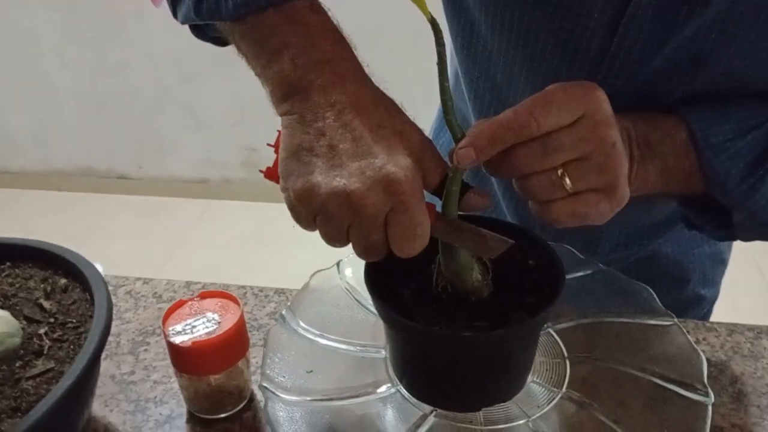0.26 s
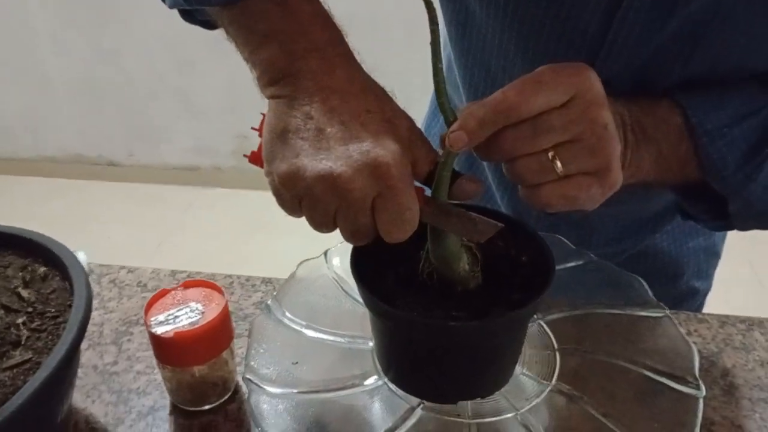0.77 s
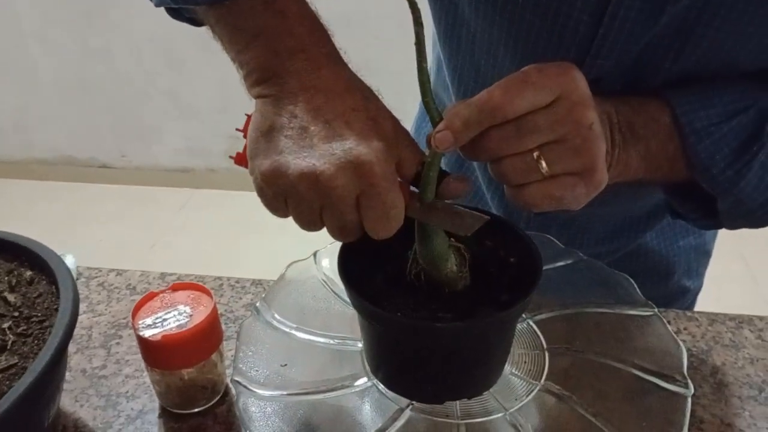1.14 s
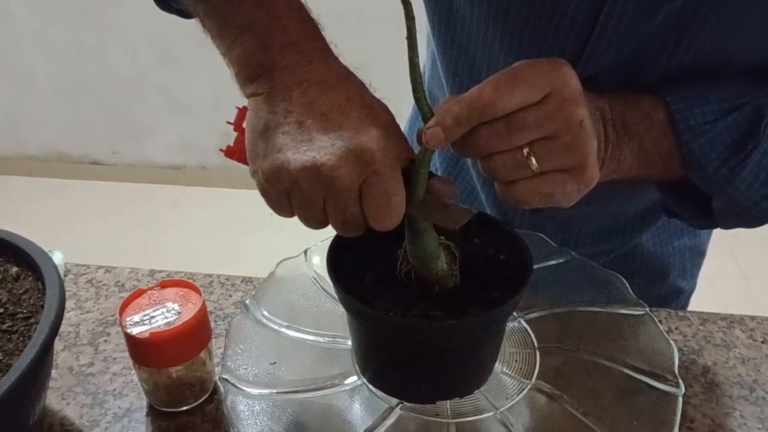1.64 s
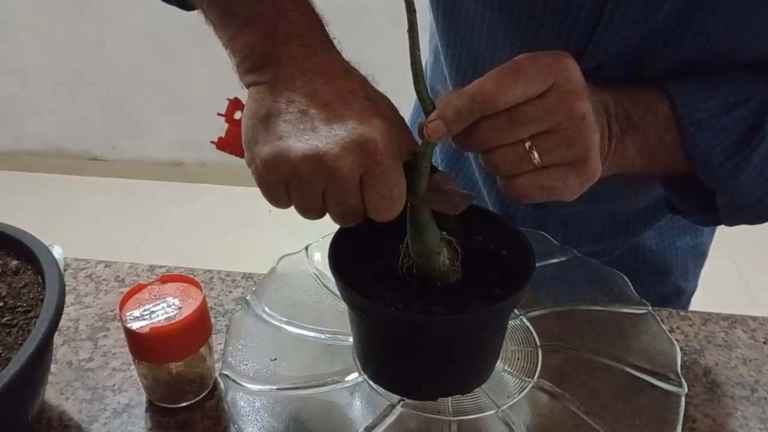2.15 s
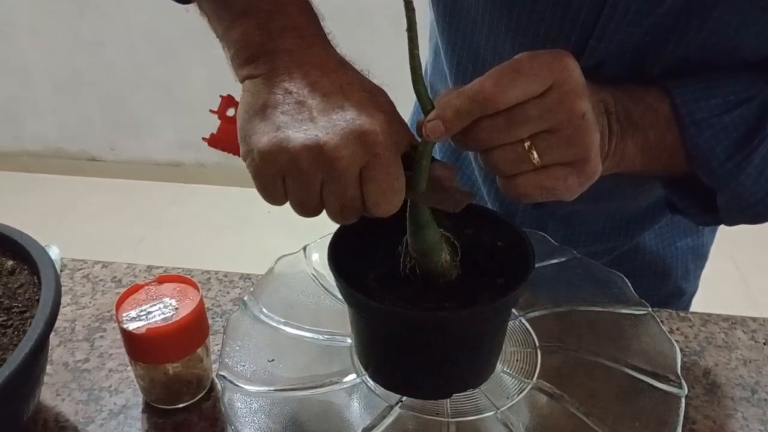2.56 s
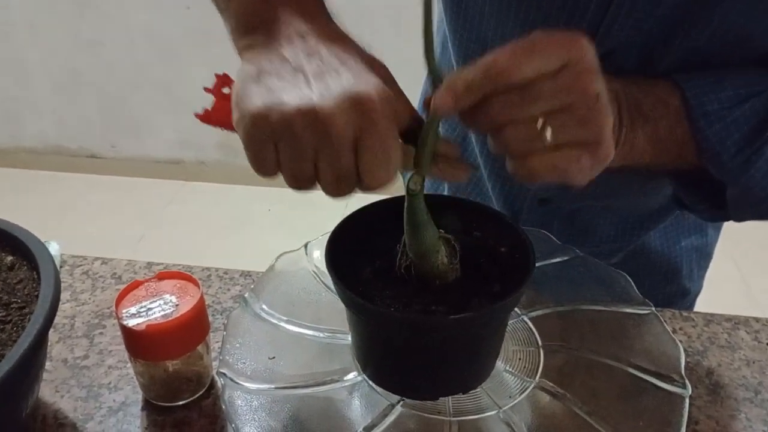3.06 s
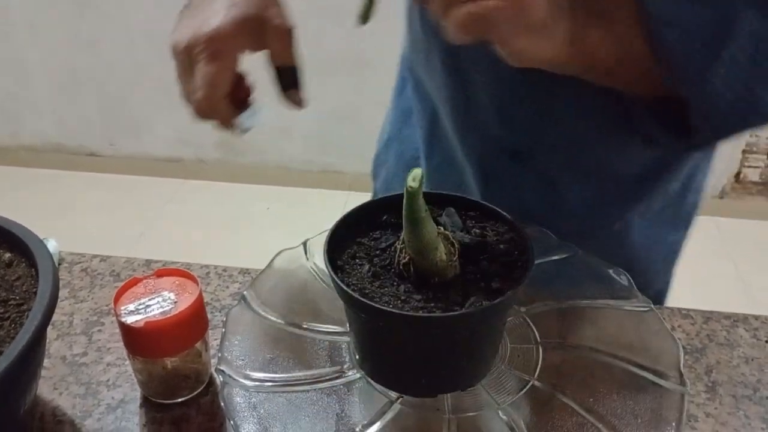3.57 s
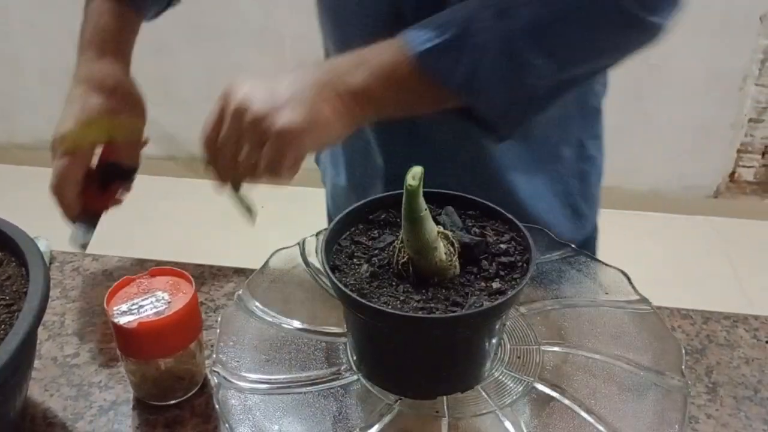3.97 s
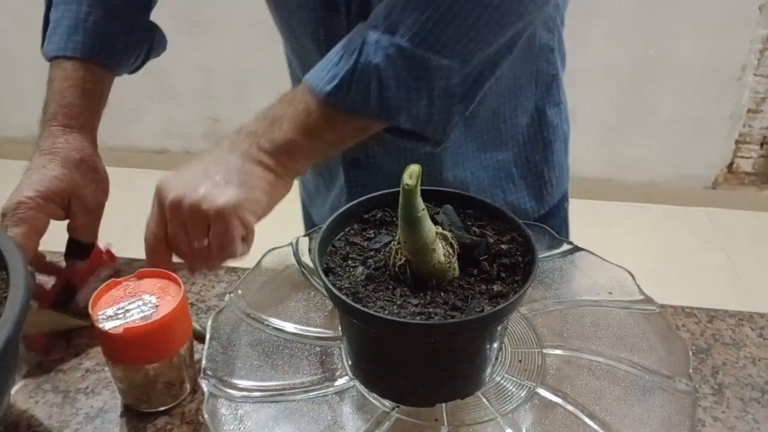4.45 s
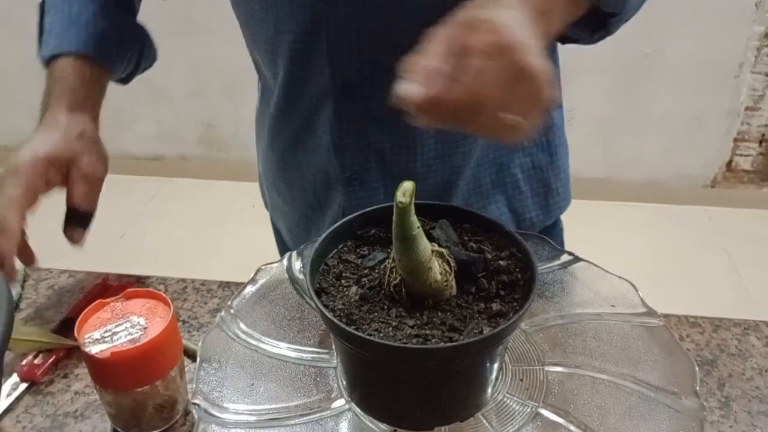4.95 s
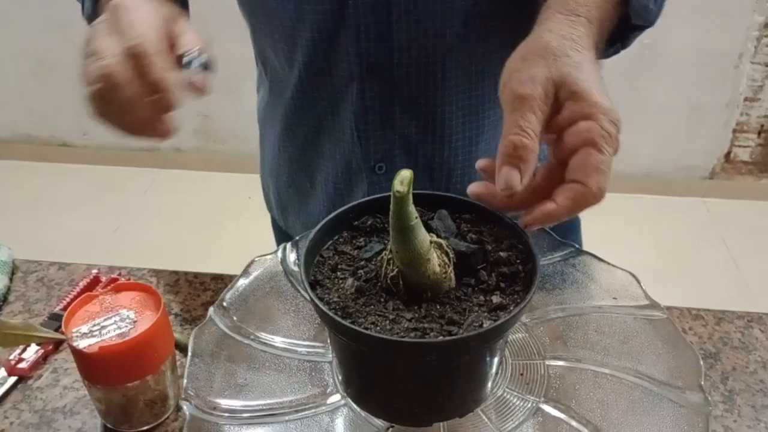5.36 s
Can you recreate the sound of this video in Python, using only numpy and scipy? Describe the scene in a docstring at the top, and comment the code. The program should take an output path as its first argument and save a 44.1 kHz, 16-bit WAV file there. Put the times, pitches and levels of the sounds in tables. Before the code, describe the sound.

Faint snaps of a stem being cut, then a dropped knife rattles loudly on stone in a bare, humming room.

```python
"""Cutting a stem, dropping the knife

A snap-off knife works through a fleshy plant stem in a pot on a glass plate: fibres snap in faint
clicks, rubbing squeaks, and the plate rings as the stem gives. Sleeves rustle, then the knife is
let go and clatters on a stone counter, its steel channel rattling and its loose blade ringing.
The bare, hard room answers, over a low hum."""
import sys
import numpy as np
from scipy import signal
from scipy.fft import rfft, irfft, next_fast_len
from scipy.io import wavfile

SR = 44100
rng = np.random.default_rng(int(sys.argv[2]) if len(sys.argv) > 2 else 0)


def log_audio(samples):
    """Write samples as a 16-bit WAV file to the path given in sys.argv[1]."""
    # one column per channel
    frames = np.atleast_2d(samples).T
    # limit to full scale, then quantise
    limited = np.clip(frames, -1, 1)
    pcm = np.round(limited * 32767).astype(np.int16)
    wavfile.write(sys.argv[1], SR, pcm)


N = 247576


def amp(db):
    """Decibels to gain."""
    return 10 ** (np.asarray(db) / 20)


def unit_rms(x):
    """Scale to rms 1."""
    return x / np.sqrt(np.mean(x ** 2) + 1e-20)


def curve_at(points, hz):
    """Interpolate (Hz, value) points on a log frequency axis."""
    freqs, values = np.transpose(points)
    return np.interp(np.log(hz + 1), np.log(freqs + 1), values)


def wobble(rate_hz, size=N):
    """Straight lines between Gaussian knots, rate_hz knots a second."""
    place = np.arange(size) * rate_hz / SR
    knots = rng.standard_normal(size // 16)
    return np.interp(place, np.arange(len(knots)), knots)


def noise(gain, size):
    """Noise of rms 1 with spectrum gain(Hz)."""
    m = next_fast_len(size)
    spectrum = rfft(rng.standard_normal(m)) * gain(np.fft.rfftfreq(m, 1 / SR))
    return unit_rms(irfft(spectrum, m)[:size])


def hiss(spectrum, size=N):
    """Noise of rms 1 coloured by (Hz, dB) points."""
    return noise(lambda hz: amp(curve_at(spectrum, hz)), size)


def resonance(hz, centre_hz, width_hz):
    """Power response of one resonance."""
    return 1 / (1 + (2 * (hz - centre_hz) / width_hz) ** 2)


def strike(t, rise_s, t60_s):
    """Envelope: linear rise, exponential decay."""
    return np.minimum(t / rise_s, 1) * amp(-60 * np.maximum(t - rise_s, 0) / t60_s)


def swells(rows):
    """Envelope: Gaussian bumps (middle s, length s, dB), summed in power."""
    t = np.arange(N) / SR
    bumps = (amp(db) * np.exp(-(2 * (t - middle_s) / length_s) ** 2) for middle_s, length_s, db in rows)
    return np.sqrt(sum(bump ** 2 for bump in bumps))


def add(track, start_s, sound):
    """Mix a sound in at start_s."""
    part = track[round(start_s * SR):][:len(sound)]
    part += sound[:len(part)]


# Hum tones. Each row: frequency in Hz, level in dB.
HUM_TONES = [(61, -75.5), (118.4, -70), (2256, -85.5)]
# Drone swells. Each row: middle in seconds, length in seconds, level in dB.
DRONE_RISES = [(2.75, 0.86, -62), (4.08, 0.54, -62.5)]
# Rumble and hiss. Each row: frequency in Hz, relative level in dB.
AIR_SPECTRUM = [(25, -42), (45, -29), (62, -12), (100, -2.5), (135, -2.5), (180, -3.5), (260, -8.5),
                (400, -15), (550, -14.5), (1000, -21), (1400, -24), (2300, -24.5), (3300, -32), (6000, -32),
                (15800, -34)]

def background(waver_db=2.5, drift_rad=0.61, drone_hz=189.5, drone_rest_db=-72.5, air_db=-58.5):
    """A wavering hum, a slowly swelling drone and a steady dull rumble with thin hiss."""
    t = np.arange(N) / SR

    def tone(hz):
        waver = amp(waver_db * wobble(5.07))
        return waver * np.sqrt(2) * np.sin(2 * np.pi * hz * t + drift_rad * wobble(9))

    hum = sum(amp(db) * tone(hz) for hz, db in HUM_TONES)
    drone = np.hypot(amp(drone_rest_db), swells(DRONE_RISES)) * tone(drone_hz)
    return hum + drone + amp(air_db) * hiss(AIR_SPECTRUM)


# Fibres snapping under blade and fingers. Each row: start in seconds, relative level in dB,
# knock offset in dB, t60 in seconds, pitch in Hz.
FIBRE_SNAPS = [(0.541, -42.5, -7, 0.011, 4200), (0.6901, -30.5, -17, 0.0065, 10200),
               (0.8855, -31, -4, 0.019, 7600), (1.0283, -34.5, -9, .02, 11700),
               (1.1488, -52, -9, 0.013, 11500), (1.2366, -46, -5.5, 0.027, 8000),
               (1.3069, -50.5, -5, 0.018, 8000), (1.6102, -28.5, -22, 0.0054, 6000),
               (1.6118, -37.5, -15, 0.025, 10000), (1.657, -43, -8, 0.023, 7000),
               (1.733, -51.5, -16, 0.029, 11000), (1.841, -45.5, -10, 0.024, 11000),
               (2.0562, -46.5, -22, 0.024, 10500), (2.1876, -49, -15, 0.024, 7500),
               (2.74, -38.5, -10, .023, 5000), (2.8585, -33.5, -15, .014, 11400),
               (2.8843, -43, -4.5, 0.019, 11000), (3.104, -56, -4, .025, 7700),
               (3.492, -48, -12, 0.016, 5300), (4.1977, -50, -8, 0.021, 8000)]
# Tearing fibre. Each row: frequency in Hz, relative level in dB.
FIBRE_SPECTRUM = [(1500, -31), (2400, -25), (3100, -23.5), (4200, -2), (5100, -5.5), (6000, -6.5),
                  (7200, 1.5), (9000, 1), (11800, 2.5), (13300, -6), (15800, -3.5)]
# Knock of stem and pot. Each row: frequency in Hz, relative level in dB.
KNOCK_SPECTRUM = [(150, -27), (400, 1.5), (800, -10.5), (1350, 2), (1900, -6.5), (2450, -4), (3000, -34),
                  (6000, -63)]
# Blade pushes through wet flesh. Each row: middle in seconds, length in seconds, relative level in dB.
BLADE_PUSHES = [(0.915, .06, -74), (1.06, .06, -75), (1.275, .11, -63.5), (2.8, .05, -70),
                (2.9, 0.065, -67), (3.1, 0.044, -65.5)]

def fibres(crackle_db=-7, knock_db=-7, pitch_boost_db=6, pitch_width_hz=2500, drag_db=-1, grain_db=4):
    """Each fibre bundle tears in a pitched crackle and knocks the stem; between them the blade drags."""
    out, t = np.zeros(N), np.arange(SR // 16) / SR
    # single fibres part at random while the blade is in the stem
    strays = [(start_s, -53, -8, 0.012, 7000) for start_s in rng.uniform(0.7, 3.3, size=3)]
    for start_s, db, knock_offset_db, t60_s, pitch_hz in FIBRE_SNAPS + strays:
        boost_db = lambda hz: pitch_boost_db * resonance(hz, pitch_hz, pitch_width_hz)
        crackle = noise(lambda hz: amp(curve_at(FIBRE_SPECTRUM, hz) + boost_db(hz)), len(t))
        knock = amp(knock_db + knock_offset_db) * hiss(KNOCK_SPECTRUM, len(t))
        rise_s = 0.082 * t60_s  # a thicker bundle takes longer both to tear and to die away
        add(out, start_s, amp(db) * strike(t, rise_s, t60_s) * (amp(crackle_db) * crackle + knock))
    drag = unit_rms(hiss(FIBRE_SPECTRUM) * amp(grain_db * wobble(700)))
    return out + amp(drag_db) * swells(BLADE_PUSHES) * drag


# Slips. Each row: middle in seconds, length in seconds, pitch in Hz, width in Hz, level in dB.
SLIPS = [(1.3, 0.045, 3940, 149, -70), (1.809, 0.064, 2280, 80, -67), (3.072, 0.014, 4600, 1400, -66.5),
         (4.094, 0.0063, 4400, 400, -55.5), (5.427, 0.035, 4870, 600, -62),
         (5.428, 0.032, 6630, 1200, -66.5)]

def squeaks():
    """Brief narrow bands of noise where skin, stem and steel slip on each other."""
    out, t = np.zeros(N), np.arange(-SR // 10, SR // 10) / SR
    for middle_s, length_s, pitch_hz, width_hz, db in SLIPS:
        envelope = amp(db) * np.exp(-(2 * t / length_s) ** 2)
        band = noise(lambda hz: resonance(hz, pitch_hz, width_hz), len(t))
        add(out, middle_s + t[0], envelope * band)
    return out


# Modes of the pot on the glass plate. Each row: frequency in Hz, level in dB, t60 in seconds.
PLATE_MODES = [(105, -45.5, 0.13), (189, -47, 0.14), (1227, -65, .18), (1572, -64, 0.25)]

def plate(start_s=2.928, rise_s=0.0058):
    """The stem gives: the pot bumps softly and the glass rings."""
    out, t = np.zeros(N), np.arange(SR // 2) / SR
    for hz, db, t60_s in PLATE_MODES:
        add(out, start_s, amp(db) * strike(t, rise_s, t60_s) * np.sin(2 * np.pi * hz * t))
    return out


# Arm movements. Each row: middle in seconds, flap length in seconds, flap level in dB,
# relative swish level in dB.
ARM_MOVES = [(3.44, .12, -69, -66.5), (3.774, 0.22, -61.5, -64), (4.24, 0.32, -66, -64.5),
             (5.066, 0.22, -65, -67.5), (5.54, 0.093, -59.5, -69)]
# Flapping shirt. Each row: frequency in Hz, relative level in dB.
FLAP_SPECTRUM = [(120, -20), (200, -4.5), (550, -2), (850, -11.5), (1700, -8.5), (2600, -16), (4000, -42)]
# Sliding cloth. Each row: frequency in Hz, relative level in dB.
SWISH_SPECTRUM = [(1470, -30), (2500, -14), (3080, -6), (4420, 3.5), (5980, -1.5), (8790, 2.5), (14400, -5),
                  (15800, -17)]

def sleeves(swish_db=-4, swish_stretch=2.47, crease_db=2):
    """Moving arms flap the shirt and slide cloth over cloth."""
    flap = swells([(s, length_s, db) for s, length_s, db, _ in ARM_MOVES])
    swish = swells([(s, swish_stretch * length_s, db + swish_db) for s, length_s, _, db in ARM_MOVES])
    creases = amp(crease_db * wobble(40))
    return creases * (flap * hiss(FLAP_SPECTRUM) + swish * hiss(SWISH_SPECTRUM))


# Handle and counter. Each row: frequency in Hz, relative level in dB.
HANDLE_SPECTRUM = [(100, -26), (250, -18.5), (450, -11), (700, -18), (1000, -14), (1400, -13.5),
                   (1900, -11), (2900, -14), (4000, -7.5), (4700, -3.5), (7000, -1.5), (10000, 0.5),
                   (12700, -6), (14200, -5), (15800, -9)]
# Steel channel modes. Each row: frequency in Hz, width in Hz, relative level in dB.
CHANNEL_MODES = [(1847, 32, 0.5), (3180, 140, 1.5), (3970, 86, 0), (5050, 80, 0), (6370, 135, 2),
                 (7020, 140, -2), (7630, 110, -6), (8110, 60, -3), (8860, 130, -3), (9700, 260, -6),
                 (10440, 36, -1), (12000, 90, -5), (13950, 62, -5)]

def rattle(bright_db, size, steel_db=7, scatter_db=2.2):
    """The steel channel rattles in the handle; the corner that lands sets their balance."""
    tilt = [(2500, 0.5 - bright_db), (6000, 0), (9500, 0.0053), (13000, bright_db)]

    def gain(hz):
        handle = amp(curve_at(HANDLE_SPECTRUM, hz) + curve_at(tilt, hz))
        steel = sum(amp(db + steel_db + rng.normal(0, scatter_db)) ** 2 * resonance(hz, mode_hz, width_hz)
                    for mode_hz, width_hz, db in CHANNEL_MODES)
        return handle * np.sqrt(1 + steel)

    return noise(gain, size)


# Knife on stone. Each row: start in seconds, relative level in dB, brightness in dB, clack pitch in Hz.
KNIFE_BOUNCES = [(4.4155, -30.5, -9, 900), (4.418, -15, -1, 7480), (4.4673, -6, 0.5, 4110),
                 (4.4884, -18.5, -9, 6600), (4.5014, -15, -1, 9800), (4.5266, -14.5, 0.5, 3290),
                 (4.5602, -18.5, 2.5, 10000), (4.5635, -9, 6, 9450), (4.5816, -16.5, 6, 9070),
                 (4.587, -13, 1.5, 8900), (4.6093, -20.5, 0, 2640), (4.6165, -14.5, 0, 9800),
                 (4.6423, -12.5, 3.5, 5240), (4.6713, -18.5, 1.5, 6400), (4.6938, -29, -4, 8700),
                 (4.7217, -32.5, -8, 5230)]
# Loose blade modes. Each row: frequency in Hz, relative level in dB, t60 in seconds.
BLADE_MODES = [(720, -14.5, 0.63), (2660, -16.5, .65), (3935, -19, .55), (5100, -6.5, 0.55),
               (5180, -5, .68), (6165, -15, 0.6), (6400, -5.5, .48), (6350, -5, .5), (6645, -10, 0.42),
               (7300, -11, .45), (7520, -9, .45), (7640, -9, .4), (8870, -8, .35), (9609, -9, .22)]

def knife(let_go_s=4.45, rise_s=0.0011, contact_db=-9.5, blade_db=-35, chatter_db=0.5,
          clack_db=-7.5, clack_q=15, hard_db=-5.5, hard_t60_s=0.047, doubling_db=10.5, max_t60_s=0.098):
    """Every bounce rattles the knife, favours one mode in a clack and sets the blade ringing anew."""
    out, t = np.zeros(N), np.arange(SR // 2) / SR
    size = SR // 8
    modes = np.array([amp(db) * strike(t, rise_s, t60_s) * np.exp(2j * np.pi * hz * t)
                      for hz, db, t60_s in BLADE_MODES])
    for start_s, db, bright_db, clack_hz in KNIFE_BOUNCES:
        freedom = 0.74 if start_s < let_go_s else 1  # fingers damp rattle and ring
        # a hard blow rebounds cleanly, a softer one chatters longer
        t60_s = freedom * min(hard_t60_s * 2 ** ((hard_db - db) / doubling_db), max_t60_s)
        envelope = amp(db + contact_db) * strike(t[:size], rise_s, t60_s)
        body = rattle(bright_db, size)
        clack = amp(clack_db) * noise(lambda hz: resonance(hz, clack_hz, clack_hz / clack_q), size)
        chatter = unit_rms(amp(chatter_db * wobble(990, size)))  # loose parts
        add(out, start_s, envelope * (chatter * body + clack))
        gains = amp(rng.normal(0, 1.9, len(modes)))
        phasors = np.exp(2j * np.pi * rng.random(len(modes)))
        ring = ((gains * phasors) @ modes).real
        add(out, start_s, freedom * amp(db + blade_db) * ring)
    return out


# Room decay. Each row: frequency in Hz, t60 in seconds.
ROOM_DECAY = [(200, 1), (1000, 0.96), (3000, 0.64), (6000, 0.59), (9000, 0.48), (12000, 0.35),
              (15000, 0.28)]

def room(x, build_s=0.0085):
    """Wall reflections build briefly, then die, the treble first."""
    hz, t, spectra = signal.stft(rng.standard_normal(SR), SR, nperseg=256)
    decay = amp(-60 * t / curve_at(ROOM_DECAY, hz)[:, None])
    build = 1 - np.exp(-t / build_s)
    _, tail = signal.istft(spectra * decay * build, SR, nperseg=256)
    return signal.fftconvolve(x, tail / np.linalg.norm(tail))[:N]


def scene(cut_room_db=-14, knife_room_db=-5.0):
    """The cut is close and nearly dry; the clatter fills the room. Mono."""
    cut = fibres() + plate() + squeaks()
    clatter = knife()
    walls = room(amp(cut_room_db) * cut + amp(knife_room_db) * clatter)
    return (cut + clatter + walls + sleeves() + background())[None]


def record(dry, top_hz=15780):
    """Brick-wall low-pass at top_hz."""
    m = next_fast_len(N + SR // 2)
    passband = np.fft.rfftfreq(m, 1 / SR) < top_hz
    return irfft(rfft(dry, m) * passband, m)[..., :N]


dry = scene()
out = record(dry)
log_audio(out)
```